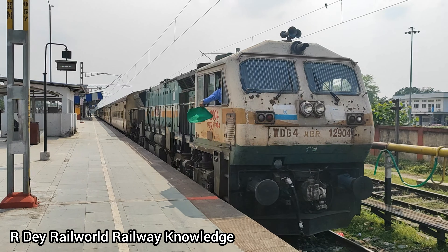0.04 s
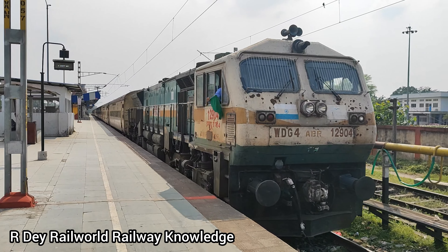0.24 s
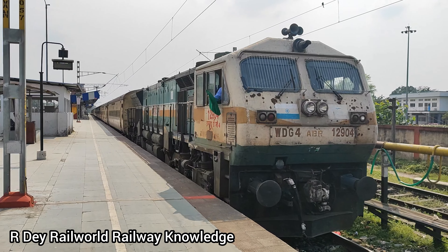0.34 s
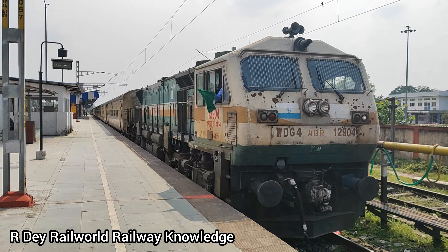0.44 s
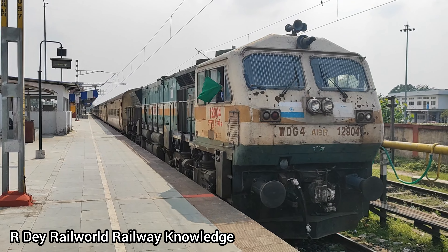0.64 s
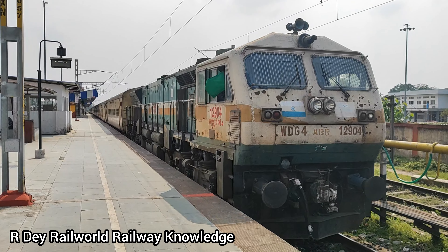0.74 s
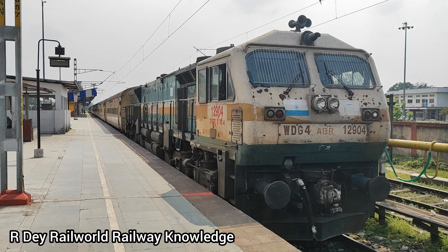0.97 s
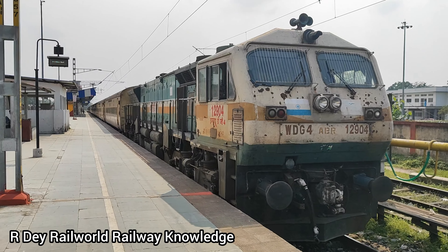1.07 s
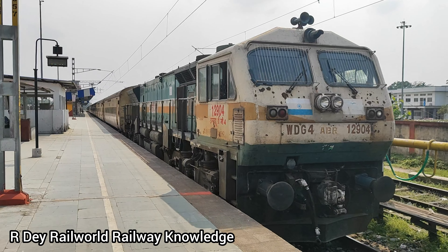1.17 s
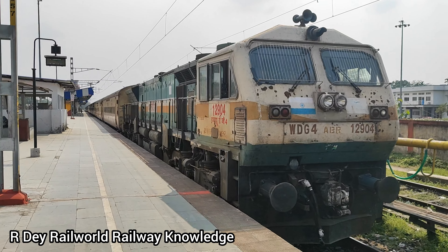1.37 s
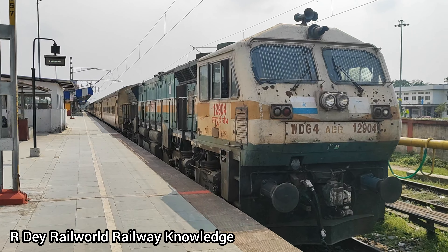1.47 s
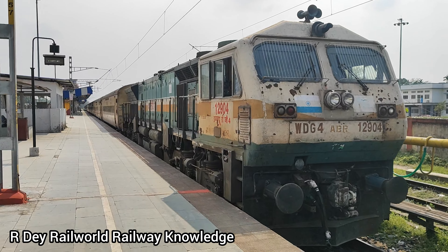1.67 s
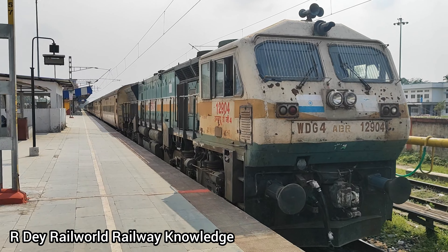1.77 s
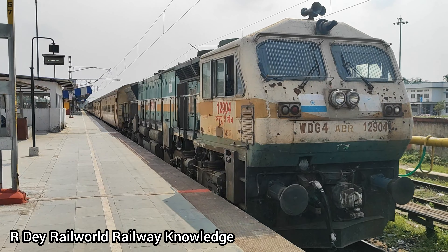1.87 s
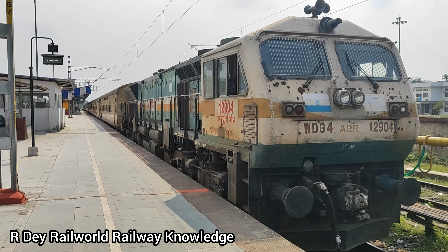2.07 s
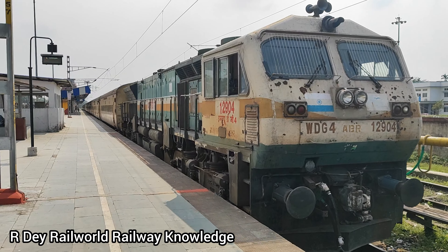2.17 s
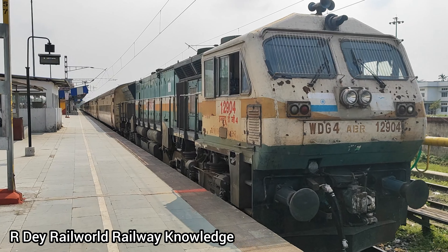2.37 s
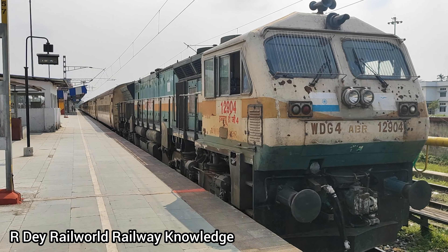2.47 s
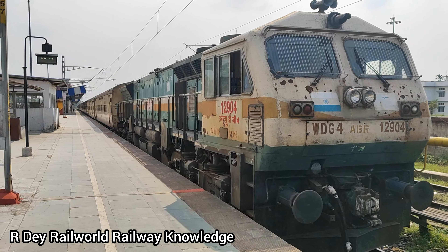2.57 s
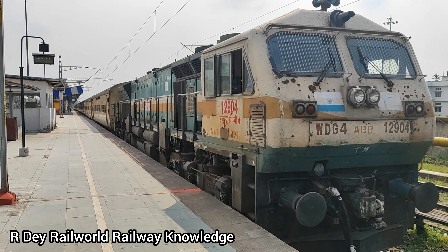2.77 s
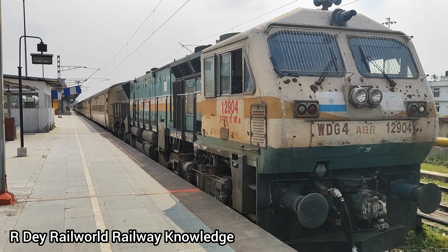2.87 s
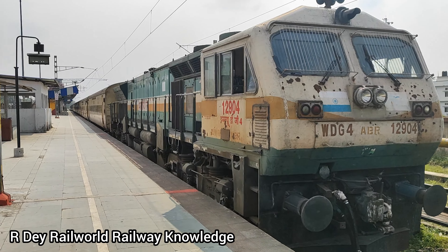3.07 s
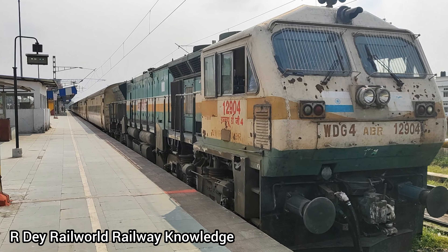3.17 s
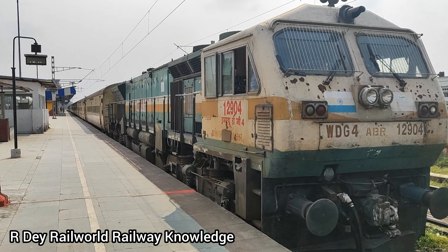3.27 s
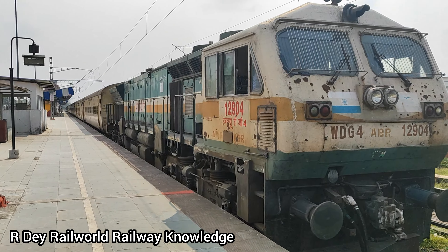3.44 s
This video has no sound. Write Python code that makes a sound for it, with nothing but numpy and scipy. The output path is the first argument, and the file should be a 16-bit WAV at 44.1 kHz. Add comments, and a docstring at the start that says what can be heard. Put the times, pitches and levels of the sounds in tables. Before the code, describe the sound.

Close outdoor stereo pickup on an open station platform. A large diesel locomotive is already throbbing when it starts, with deep uneven firings, knocking metal, ringing panels and a low rumble. Broad fan roar fills the middle, while thin gear and turbo whines swell and fade. Everything slowly grows louder as it nears, and soft high puffs of air emerge near the end.

```python
"""A large two-stroke diesel locomotive creeps towards a pair of microphone ports on an open platform.
From the start sixteen uneven firings a turn throb through duct resonances, over a low rumble of noise;
valve-gear blows knock the block and ring the hood; crank multiples drone, and gears and turbocharger
whine in swelling tones. Fans roar and air hisses in shaped noise. As the engine nears it all grows,
and one puff a turn comes to stand out of the air leak."""
import sys
import numpy as np
from scipy import signal
from scipy.fft import rfft, irfft, next_fast_len
from scipy.io import wavfile
from scipy.ndimage import uniform_filter1d, map_coordinates

SR = 44100
rng = np.random.default_rng(int(sys.argv[2]) if len(sys.argv) > 2 else 0)


def file_out(sig):
    """Save sig as 16-bit WAV at sys.argv[1]."""
    # one column per channel
    cols = np.atleast_2d(sig).T
    # limit, then scale
    lim = np.clip(cols, -1, 1)
    pcm = np.round(lim * 32767).astype(np.int16)
    wavfile.write(sys.argv[1], SR, pcm)


def how_loud(loudness_db):
    """Turn decibels into a plain amplitude multiplier (0 dB gives 1, 20 dB gives 10)."""
    steps = np.asarray(loudness_db, float) / 20
    return 10 ** steps


N = 275226
T = np.arange(N) / SR  # seconds
TURN_HZ = 4.5096  # crankshaft turns a second
PORT_LAG_S = 4.5 / SR  # the right port hears the engine this much later


def unit(x):
    """Scaled to rms 1."""
    return x / np.sqrt(np.mean(x ** 2) + 1e-20)


def along(points, hz):
    """Value at hz of a curve of (Hz, value) points, straight on a log frequency axis."""
    f, v = np.transpose(points)
    return np.interp(np.log(hz + 1), np.log(f + 1), v)


def curves(rows):
    """One value per sample for each column after the time."""
    s, *cols = np.transpose(rows)
    return [np.interp(T, s, c) for c in cols]


def wobble(rate):
    """A smooth random curve, rate knots a second."""
    knots = rng.standard_normal(int(N * rate / SR) + 4)
    return map_coordinates(knots, [T * rate])


def filtered(x, response):
    """x times a complex response of frequency."""
    m = next_fast_len(N + SR // 2)
    hz = np.fft.rfftfreq(m, 1 / SR)
    return irfft(rfft(x, m) * response(hz), m)[..., :N]


# How the engine comes closer and its air leak changes.
# Each row: time in seconds, gain of the nearing engine in dB, air leak level before its puffs in dB.
APPROACH = [(0, -0.5, -60), (1, 0.5, -58.5), (2, 0.5, -58.5), (3, 1.5, -62.5), (4, 2.5, -57), (5, 3, -54.5),
            (5.7, 3.5, -55), (6.24, 4, -52)]


def near(start_db, share):
    """Level in dB of a part of the engine: start_db plus share dB for each dB of nearing gain."""
    return start_db + share * curves(APPROACH)[0]


# The pattern of a turn arrives a little early or late as speed and distance change.
# Each row: time in seconds, lateness in ms.
CRANK_LAG = [(0.0, -0.02), (0.67, -0.04), (1.56, 0.18), (2.45, 0.47), (3.34, 0.16), (4.23, -0.17),
             (5.13, -0.23), (6.24, -0.52)]


def crank_lag(s):
    """Lateness in seconds of the turning crank at time s, as speed and distance change."""
    return np.interp(s, *np.transpose(CRANK_LAG)) / 1000


def resonant(modes, top_hz, f):
    """Causal response of a few resonances of alternating sign; soft blows carry nothing far above top_hz."""
    ring = 0
    for k, (centre, width, db) in enumerate(modes):
        damping = 1j * f * width
        ring = ring + (-1) ** k * how_loud(db) * damping / (centre * centre - f * f + damping)
    return ring / (1 + (f / top_hz) ** 8)


def with_scattered(blows, count):
    """The set blows of a turn plus count more, mostly lighter, at random angles, the same every turn."""
    middle_db, spread_db = -33, 4
    chance = rng.random((count, 2))
    scattered = np.c_[360 * chance[:, 0], middle_db + spread_db * (2 * chance[:, 1] - 1)]
    return np.vstack([blows, scattered])


def per_turn(pattern, modes, top_hz, jitter_ms, noise_share):
    """The same blows each turn, slightly jittered, plus turbulence ringing the same resonances."""
    angle, db = np.transpose(pattern)
    turn = np.arange(-1, TURN_HZ * N / SR + 1)[:, None]
    s = (turn + angle / 360) / TURN_HZ
    chance = rng.standard_normal(s.shape + (2,))
    s = s + crank_lag(s) + jitter_ms * chance[..., 0] / 1000
    lead = SR // 4  # blows from before the start still ring
    at = np.round(s * SR).astype(int) + lead
    strength = how_loud(db + .5 * chance[..., 1])
    blows = np.bincount(at.ravel(), strength.ravel())
    shared, *own = rng.standard_normal((3, len(blows)))
    turbulence = unit(shared + 0.57 * np.array(own))  # partly alike at the two ports
    drive = np.sqrt(1 - noise_share) * unit(blows) + np.sqrt(noise_share) * turbulence
    m = next_fast_len(len(blows) + SR)
    response = resonant(modes, top_hz, np.fft.rfftfreq(m, 1 / SR))
    return unit(irfft(rfft(drive, m) * response, m)[:, lead:N + lead])


# Likeness of the noise at the two ports. Each row: frequency in Hz, likeness from 0 to 1.
LIKENESS = [(60, 1), (300, 0.83), (800, 0.48), (1500, 0.64), (3000, 0.2), (6000, 0.53), (10000, 0.076)]


def rush(spectrum, patchy_db):
    """Stereo noise of rms 1, shaped by a spectrum, with time-frequency patches of random gain."""
    z = signal.stft(rng.standard_normal((2, N)), nperseg=512)[2]
    field = uniform_filter1d(rng.standard_normal(z.shape[1:]), size=2, axis=0)
    field = uniform_filter1d(field, size=7, axis=1)
    pair = signal.istft(z * how_loud(patchy_db * unit(field)), nperseg=512)[1][:, :N]

    def mid_side(hz):
        turn = np.arccos(np.clip(along(LIKENESS, hz), -1, 1)) / 2
        return how_loud(along(spectrum, hz)) * [np.cos(turn), np.sin(turn)]

    mid, side = filtered(pair, mid_side)
    return unit(np.array([mid + side, mid - side]))


# Firings within a turn. Each row: crank angle in degrees, relative strength in dB.
FIRINGS = [(-4.6, -3.5), (31.3, -10.0), (37.5, 5.5), (63.8, 7.9), (89.3, 6.7), (114.1, 6.0), (124.8, -0.4),
           (159.8, 2.5), (186.1, 0.1), (211.4, -1.7), (225.2, 3.3), (253.5, 10.0), (280.1, 5.7),
           (299.2, 2.0), (310.2, 0.9), (326.1, 1.0)]
# Exhaust duct resonances. Each row: centre in Hz, width in Hz, relative level in dB.
EXHAUST_DUCT = [(70.0, 7.1, -40.6), (74.2, 9.1, -30.8), (82.0, 12.2, -32.4), (102.8, 5.1, -40.9),
                (135.2, 6.3, -58.2), (181.2, 5.0, -58.0)]


def exhaust():
    """Sixteen uneven firings a turn set the exhaust duct throbbing."""
    throb = per_turn(FIRINGS, EXHAUST_DUCT, top_hz=260, jitter_ms=.04, noise_share=.006)
    return how_loud(near(-23.5, 0.75)) * throb


# Valve-gear blows on the block at set crank angles, most of them hard.
# Each row: crank angle in degrees, relative strength in dB.
BLOCK_BLOWS = [(15, -29), (53, -22), (62, -21.5), (99, -23), (150, -26), (192, -23.5), (219, -35.5),
               (227, -29.5), (264, -22.5), (276, -26.5), (331, -24.5), (339, -35)]
# Block resonances. Each row: centre in Hz, width in Hz, relative level in dB.
BLOCK_MODES = [(195.5, 24.3, -1), (233.3, 17.2, 4), (293, 34.6, 1), (350.3, 26.6, -1), (431, 73, -1),
               (460, 210, -9.5)]


def block_thuds():
    """Valve-gear blows, set and scattered, knock the resonances of the block."""
    blows = with_scattered(BLOCK_BLOWS, count=14)
    thuds = per_turn(blows, BLOCK_MODES, top_hz=700, jitter_ms=.06, noise_share=.12)
    return how_loud(near(-35, 0.64)) * thuds


# Blows that ring the hood panels at set crank angles, most of them hard.
# Each row: crank angle in degrees, relative strength in dB.
HOOD_BLOWS = [(14, -26), (33, -29.5), (49, -25), (78, -22), (100, -21.5), (137, -27), (146, -24.5),
              (158, -30.5), (169, -26.5), (201, -26), (212, -25.5), (221, -26.5), (231, -26), (242, -26.5),
              (261, -28), (294, -27), (313, -27.5), (333, -23.5), (359, -28)]
# Hood panel resonances. Each row: centre in Hz, width in Hz, relative level in dB.
HOOD_MODES = [(647.3, 40, -3), (683.3, 10.4, 2.5), (720.8, 27, 3), (761.7, 29, 0), (775, 34, 0.5),
              (800, 455, -15.5)]


def hood_ring():
    """Blows, set and scattered, ring the hood panels with more turbulence than the block has."""
    blows = with_scattered(HOOD_BLOWS, count=6)
    ring = per_turn(blows, HOOD_MODES, top_hz=1300, jitter_ms=.04, noise_share=.27)
    return how_loud(near(-30.5, 0.62)) * ring


# Colour of the low rumble. Each row: frequency in Hz, relative level in dB per Hz.
RUMBLE_COLOUR = [(22, -40), (50, -28), (90, -19), (135, -1.5), (200, -5.5), (300, -11), (500, -11.5),
                 (800, -21.5), (1000, -16), (1300, -51.5)]


def rumble():
    """A steady bed of low noise that grows at the same rate as the block."""
    return how_loud(near(-37.5, 0.64)) * rush(RUMBLE_COLOUR, patchy_db=1)


# One bank's firing drone and gear meshes.
# Each row: multiple of crank speed, level in dB at the start, level in dB at the end.
SHAFT_ORDERS = [(7, -55, -55), (8, -39, -39), (9, -54, -54), (11, -48, -48), (12, -57, -57), (13, -56, -56),
                (76, -50, -42), (90, -50, -46), (153, -48, -35)]


def shaft_tones():
    """Sines at multiples of the crank speed; the highest three grow as the engine nears."""
    turns = TURN_HZ * (T - crank_lag(T))
    out = np.zeros(N)
    for order, start_db, end_db in SHAFT_ORDERS:
        level = how_loud(start_db + (end_db - start_db) * T / T[-1])
        out += level * np.sqrt(2) * np.sin(2 * np.pi * (order * turns + rng.random()))
    return out


# Pitches in Hz of the low, middle and high gear mesh and of the turbocharger.
WHINE_PITCHES = [1492.8, 2188.5, 2559.8, 3990.5]
# How each whine differs between the ports. Each row: lean to the left and lead of the left, both as
# shares of the tone, scattered sound in dB, its fades a second.
WHINE_PATHS = [(-.07, .52, -54, 6), (.18, .3, -51, 5), (.19, .1, -50, 4), (.15, -.42, -49, 5)]
# The four whines swell and fade. Each row: time in seconds, level in dB.
LOW_SWELL = [(0.0, -52), (1.49, -44), (1.64, -38), (2.03, -45), (2.24, -38), (2.84, -44), (4.44, -38),
             (4.68, -45), (5.06, -38), (5.64, -50), (6.17, -40), (6.24, -47)]
MID_SWELL = [(0.0, -50), (0.64, -41), (1.58, -49), (1.78, -35), (1.99, -45), (2.4, -40), (2.53, -49),
             (2.63, -38), (2.78, -39), (3.48, -55), (3.57, -40), (3.81, -53), (4.06, -38), (4.69, -55),
             (4.86, -39), (5.05, -35), (5.18, -47), (5.87, -55), (6.09, -40), (6.24, -49)]
HIGH_SWELL = [(0.0, -54), (0.54, -43), (0.81, -57), (1.07, -41), (1.32, -39), (1.68, -42), (2.08, -55),
              (2.2, -42), (2.29, -46), (2.5, -40), (3.05, -56), (3.39, -43), (3.55, -51), (3.9, -42),
              (4.37, -46), (4.65, -40), (5.14, -42), (5.5, -57), (5.85, -41), (5.93, -49), (6.11, -43),
              (6.24, -53)]
TURBO_SWELL = [(0.0, -50), (1.02, -60), (1.13, -47), (1.4, -59), (1.63, -45), (1.84, -55), (2.09, -46),
               (2.46, -60), (3.14, -47), (3.45, -60), (3.7, -45), (3.95, -44), (4.16, -52), (4.26, -45),
               (4.47, -56), (4.7, -42), (4.79, -44), (4.99, -41), (5.16, -44), (5.25, -56), (5.46, -46),
               (5.63, -59), (6.09, -46), (6.24, -55)]


def whines():
    """Gear and turbocharger tones; scattered sound fades them in turn at one port and the other."""
    out = np.zeros((2, N))
    side = np.array([[1], [-1]])
    swells = [LOW_SWELL, MID_SWELL, HIGH_SWELL, TURBO_SWELL]
    for hz, (lean, lead, scatter_db, rate), swell in zip(WHINE_PITCHES, WHINE_PATHS, swells):
        scatter = how_loud(scatter_db) * (unit(wobble(rate)) + 1j * unit(wobble(rate)))
        direct = how_loud(curves(swell)[0]) * (1 + side * (lean + 1j * lead))
        paths = direct + side * scatter / np.sqrt(2)
        drifting_hz = hz * (1 + .0003 * wobble(6))
        # cancels the lag between the ports, so the whines come from straight ahead
        cycles = np.cumsum(drifting_hz) / SR - side * hz * PORT_LAG_S / 2
        out += np.sqrt(2) * np.imag(paths * np.exp(2j * np.pi * cycles))
    return out


def faint_tones(rows, level_db):
    """Fuzzy tones: narrow bands of noise, unrelated at the two ports."""
    out = np.zeros((2, N))
    for hz, db, spread in rows:
        noise = rng.standard_normal((2, N))
        out += how_loud(db) * unit(filtered(noise, lambda f: 1 / (1 + ((f - hz) / spread) ** 2)))
    return how_loud(level_db) * out


# Colour of the fan roar. Each row: frequency in Hz, relative level in dB per Hz.
ROAR_COLOUR = [(500, -6.5), (850, 5), (1150, -2), (1400, 1.5), (1460, 3), (1860, 0.5), (2210, 2.5),
               (2420, -3.5), (2630, -0.5), (2740, -26.5), (2900, -10.5), (3770, -134), (6380, -120)]
# Fuzzy tones in the roar. Each row: frequency in Hz, level against the fans in dB, spread in Hz.
ROAR_FUZZ = [(995.5, -12.5, .8), (1069, -14, 2), (2143, -8, 20)]


def fan_roar():
    """Fans: broad, slightly unsteady noise with a few fuzzy tones in it."""
    level_db = near(-33.5, 0.84) + 0.19 * wobble(3.67)
    roar = how_loud(level_db) * rush(ROAR_COLOUR, patchy_db=1.95)
    return roar + faint_tones(ROAR_FUZZ, near(-34.5, 0.84))


# Colour of the hiss. Each row: frequency in Hz, relative level in dB per Hz.
HISS_COLOUR = [(1590, -35), (2700, -63), (3060, -5), (3730, -0.5), (4200, -0.5), (4610, -11), (6660, -6.5),
               (7160, -15), (7490, -78), (7710, -45), (8990, -13), (11400, -19), (12300, -28), (12600, -33),
               (15600, -49)]
# Fuzzy tones in the hiss. Each row: frequency in Hz, level against the hiss tones' own fader in dB,
# spread in Hz.
HISS_FUZZ = [(3987, -19.5, 25), (4335, -28.5, 25), (7964, -40.5, 5.6), (11910, -34.5, 29),
             (12000, -33.5, 20), (12457, -43, 15)]


def hiss():
    """Treble noise with fine, deep time-frequency patches of random gain, and fuzzy tones."""
    noise = how_loud(near(-51.5, 0.84)) * rush(HISS_COLOUR, patchy_db=5.5)
    leak_db = curves(APPROACH)[1]
    tones_db = (near(-34.5, 0.84) + leak_db) / 2 + 16  # follows both fans and leak
    return noise + faint_tones(HISS_FUZZ, tones_db)


# Colour of the air leak. Each row: frequency in Hz, relative level in dB per Hz.
LEAK_COLOUR = [(8500, -34), (8900, -0.5), (11000, -10), (12500, -7), (15000, -13)]


def air_leak():
    """High noise of escaping air, whose puff once a turn stands out as the engine nears."""
    puff = np.exp(1.6 * (np.cos(2 * np.pi * (TURN_HZ * T - .03)) - 1))
    swell = .5 + .8 * puff * T / T[-1]
    return how_loud(curves(APPROACH)[1]) * swell * rush(LEAK_COLOUR, patchy_db=4)


def scene():
    """Engine, whines and air reach both ports."""
    engine = exhaust() + block_thuds() + hood_ring() + rumble() + shaft_tones()
    air = fan_roar() + hiss() + air_leak()
    return engine + whines() + air


def top_cut(x):
    """Nothing passes above the cut-off."""
    return signal.sosfilt(signal.butter(12, 15500, fs=SR, output="sos"), x)


# Tone balance of the ports. Each row: frequency in Hz, left over right in dB.
PORT_BALANCE = [(60, 0.5), (250, -.5), (700, 0), (2000, 2), (3300, -3.5), (6000, 7.5), (8800, -11.5),
                (11000, -9.5), (15000, 0.5)]


def record(dry):
    """The right port hears the engine a moment later; each port has its own tone balance."""
    side = np.array([[.5], [-.5]])

    def ports(hz):
        delay_s = PORT_LAG_S * (.5 - side)
        return how_loud(side * along(PORT_BALANCE, hz)) * np.exp(-2j * np.pi * hz * delay_s)

    mix = filtered(dry, ports)
    return top_cut(mix)


dry = scene()
out = record(dry)
file_out(out)
```